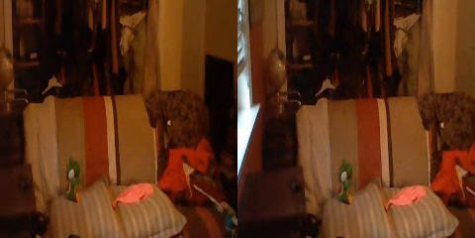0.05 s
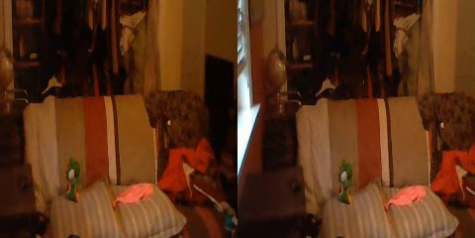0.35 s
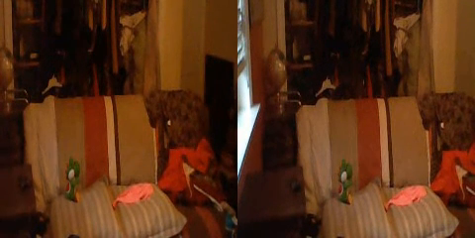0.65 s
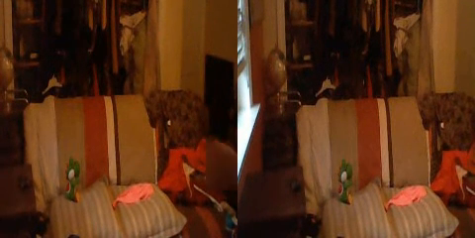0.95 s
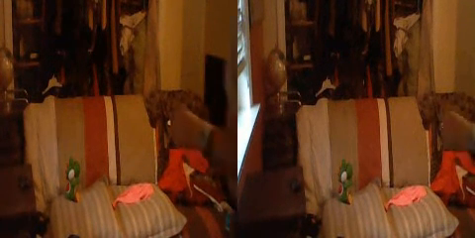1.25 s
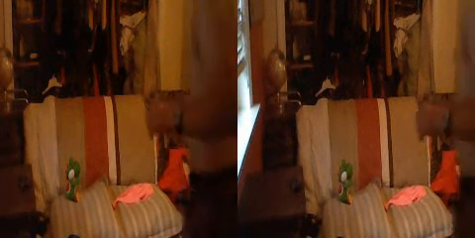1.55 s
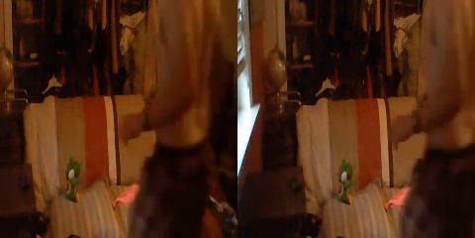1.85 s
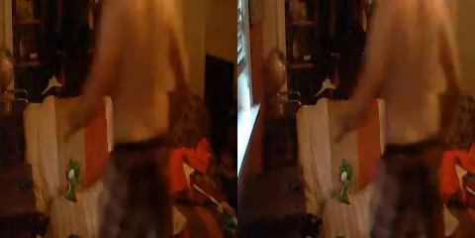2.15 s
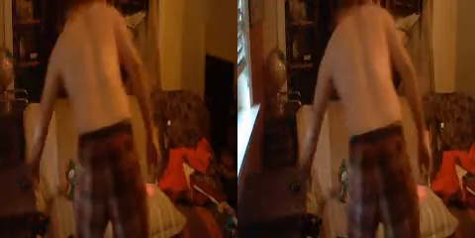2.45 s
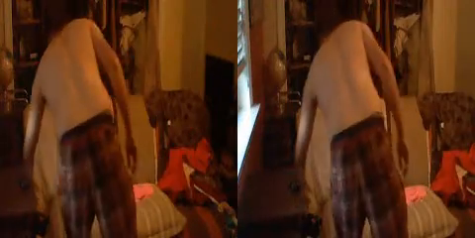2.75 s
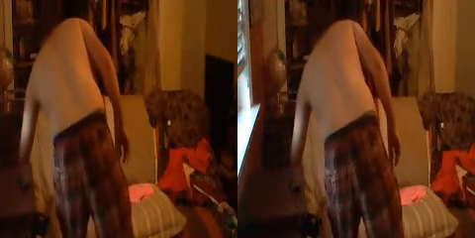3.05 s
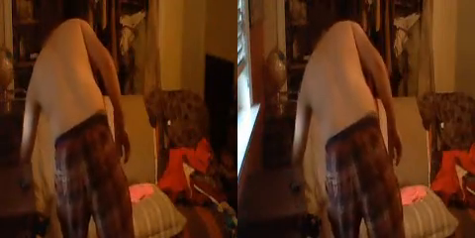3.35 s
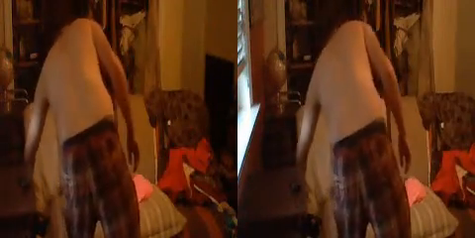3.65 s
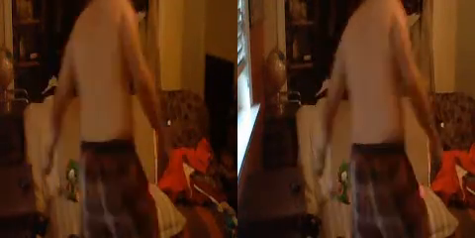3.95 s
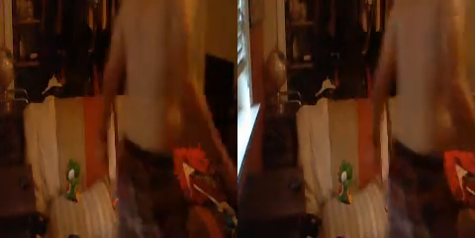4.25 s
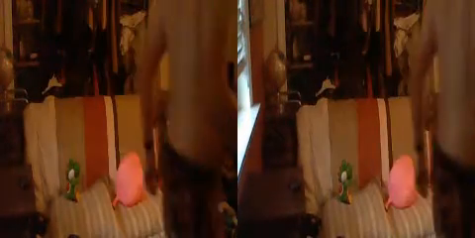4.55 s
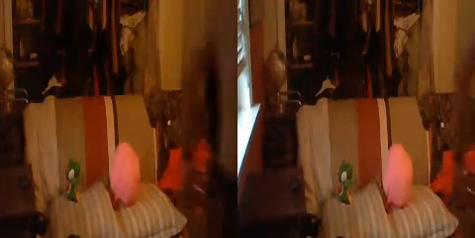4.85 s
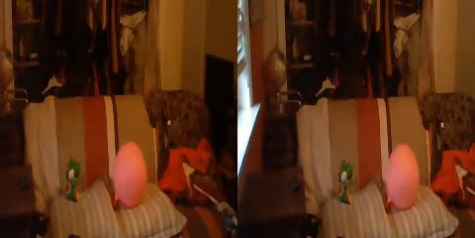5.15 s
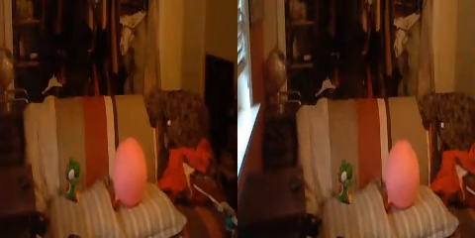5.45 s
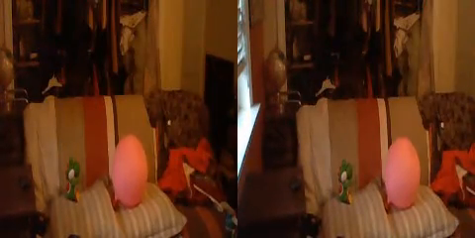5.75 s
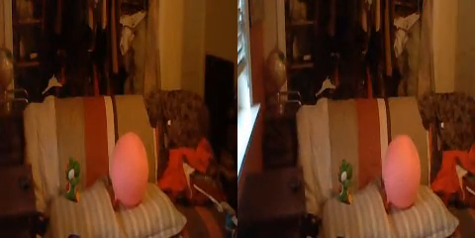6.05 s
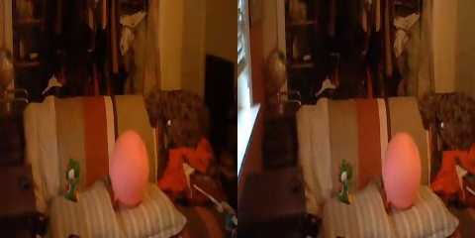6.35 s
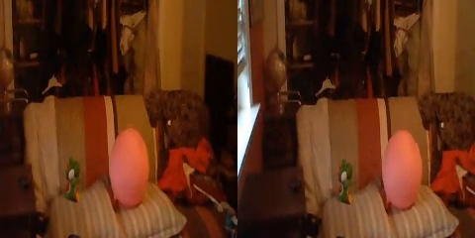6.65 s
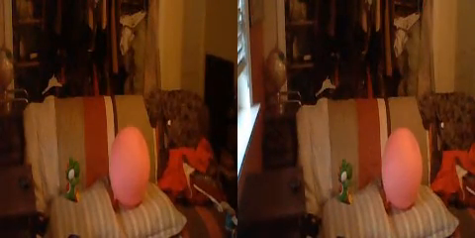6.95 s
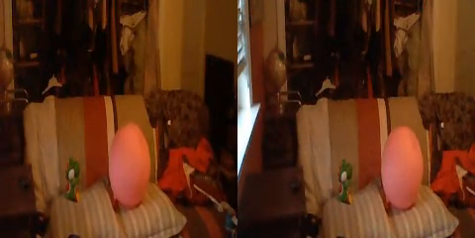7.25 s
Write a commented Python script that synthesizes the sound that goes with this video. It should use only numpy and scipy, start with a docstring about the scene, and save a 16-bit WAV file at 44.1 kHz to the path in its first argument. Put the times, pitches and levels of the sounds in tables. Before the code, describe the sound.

Low room rumble and faint microphone hiss run throughout, in a small furnished room heard from a webcam a little way off. From about 0.3 to 2.8 seconds a man's feet softly brush and slide over carpet, with a few dull thumps on the wooden floor beneath. At 3.3 seconds an electric blower starts abruptly, much louder, with a brief rasp and a quickly rising whine. A limp balloon flaps in the air stream from 3.5 to 4.5 seconds, giving a small slap at 4.2 as it snaps upright. More low footfalls come between 4 and 5.5 seconds, the heaviest near 4.9. By about 4.5 seconds the blower has nearly levelled off into a steady rush of air with a hum and thin, wavering whistles. It brightens slightly as the balloon fills and runs on until the end at about 7.4 seconds.

```python
"""An electric blower starts up and fills a balloon in a small furnished room, heard on a webcam microphone.
Its shaft hums, six blades whine and air rushes through the housing; the limp rubber flaps, then goes taut.
The microphone is far enough off for wall echoes to make the gliding tones flutter.
Around it a man shuffles over the carpet and his footfalls shake the wooden floor.
Behind everything lie room rumble and the webcam's own hiss and frame-rate buzz."""
import sys
import numpy as np
from scipy import signal
from scipy.fft import rfft, irfft
from scipy.io import wavfile
from scipy.ndimage import uniform_filter1d

SR = 44100
rng = np.random.default_rng(int(sys.argv[2]) if len(sys.argv) > 2 else 0)


def persist_wave(psi):
    """Save psi, clipped to +-1, as 16-bit WAV."""
    counts = np.round(np.clip(psi, -1, 1) * 32767).astype(np.int16)
    wavfile.write(sys.argv[1], SR, np.atleast_2d(counts).T)


N = 325458
T = np.arange(N) / SR
FREQS = np.fft.rfftfreq(N, 1 / SR)

# Room rumble and microphone hiss. Each row: frequency in Hz, relative level in dB.
FLOOR_SPECTRUM = [(8, -24), (15, -1), (31, -15), (69, -26.5), (123, -27), (240, -32), (360, -38),
                  (500, -34), (640, -39.5), (840, -39), (3300, -42.5), (7300, -47.5), (8200, -56),
                  (8800, -76.5)]
# A sole rubbing on carpet. Each row: frequency in Hz, relative level in dB.
CARPET_SPECTRUM = [(120, -14), (200, -7.5), (360, -5), (560, -5), (770, -4), (1000, -8), (1570, -8),
                   (2000, -13), (5500, -15), (7500, -19.5), (8800, -39)]
# Short brushes of foot and cloth. Each row: start in seconds, level in dB, 60 dB decay time in seconds.
FOOT_BRUSHES = [(0.274, -47, 0.45), (.378, -51.5, 0.55), (.42, -67, 0.36), (2.185, -47.5, 0.13),
                (2.275, -54, 0.11)]
# Feet sliding on the carpet. Each row: start and end in seconds, level in dB, treble against that level
# in dB, exponent of the swell (higher starts more gently), low draught rumble in dB.
FOOT_SLIDES = [(0.56, 0.923, -49.5, 1.3, 0.68, -58), (1.06, 1.224, -70, 15.5, 1.4, -71),
               (1.329, 1.723, -44.5, -0.5, 1.8, -36), (1.996, 2.18, -67, 9.5, 0.47, -44.5),
               (2.152, 2.363, -62, 4, 1.1, -43.5), (2.498, 2.85, -67, 1, 1, -70)]
# Steps on the floor. Each row: start in seconds, relative level in dB, 60 dB decay time in seconds,
# lowest pitch of the boards in Hz.
FOOTFALLS = [(1.07, -48.5, 0.24, 123.4), (1.337, -37, 0.38, 53.7), (1.48, -47, 0.49, 38.2),
             (1.611, -46, 0.23, 75), (2.125, -47.5, 0.56, 52), (4.069, -37.5, .5, 38),
             (4.45, -41, 0.33, 41), (4.879, -29, 0.25, 53.7), (4.903, -34, 0.81, 46.4), (5.5, -46, .3, 58)]
# Floorboard modes. Each row: multiple of the lowest pitch, relative level in dB.
BOARD_MODES = [(1, 3), (1.45, -8.5), (2.1, -13), (3.2, -13)]
# Rushing air. Each row: frequency in Hz, relative level in dB.
AIR_SPECTRUM = [(110, -16.5), (150, -20), (260, -13.5), (340, -1.5), (480, -10.5), (700, -4), (1400, -8),
                (2200, -7), (4200, -9.0), (5200, -9.5), (6600, -9.5), (7600, -15), (8300, -22.5),
                (8800, -43)]
# Resonances of housing and nozzle. Each row: centre in Hz, width in Hz, boost in dB.
HOUSING_RESONANCES = [(191.5, 60, 10.5), (396, 31, 3), (532, 65, 5.5), (615, 17, 7), (754, 13, 3),
                      (882, 19, 9), (995, 50, 1.5), (1130, 49, 5.5), (1209, 28, 6), (1300, 31, 3.5),
                      (1566, 6.8, 6), (1624, 65, 0), (1782, 44, 5), (2330, 16, 7), (2630, 300, 2.5),
                      (3210, 210, 3), (4160, 520, 4)]
# The rush in four bands, from depth to hiss. Each row: full-speed gain in dB with the balloon empty,
# the same with it round, power of the speed that the amplitude follows.
RUSH_BANDS = [(-29.5, -28.5, 3.4), (-28.5, -29, 1.8), (-30, -27.5, 1.9), (-30, -29.5, 2.8)]
# Thin whistles. Each row: Hz lost per Hz of shaft rate, full-speed level in dB with the balloon slack,
# the same with it taut.
THIN_WHISTLES = [(30, -42.8, -48), (36, -41, -53)]
# Growl of the accelerating motor. Each row: multiple of the shaft rate, level in dB at greatest strain.
GROWL_PARTIALS = [(2, -40.5), (3, -50), (4, -46), (5, -49), (8, -46)]
# The shaft's quick surge and slow creep. Each row: shortfall at switch-on in Hz, time constant in seconds.
SPIN_UP_LAGS = [(279.5, .1786), (9.84, .948)]
# Course of the blade whine. Each row: time in seconds, relative level in dB.
WHINE_LEVELS = [(3.33, -55), (3.45, -40), (3.57, -28), (3.82, -34), (4.15, -40), (4.95, -31), (5.13, -45),
                (5.88, -44.5), (6.28, -30), (7.38, -32)]
# Course of the whine's octave. Each row: time in seconds, level in dB.
OCTAVE_LEVELS = [(3.33, -53), (3.5, -45), (3.66, -54.9), (3.8, -40.5), (4.45, -42.5), (4.78, -35.5),
                 (5.45, -45.5), (5.67, -35.5), (5.87, -53.5), (6.05, -38), (6.3, -51.8), (6.5, -34),
                 (6.8, -39.5), (7.08, -30), (7.38, -32)]
# Weak shaft overtones. Each row: multiple of the shaft rate, full-speed level in dB with the balloon
# slack, the same with it taut.
SHAFT_OVERTONES = [(4, -54, -53.5), (8, -66.5, -45.5), (18, -51, -44.5)]

SWITCH_ON_S, FULL_HZ = 3.305, 330.5  # the blower starts; its shaft rate at full speed
# The balloon flaps in the jet, lifts, takes its round shape (each from, to), then goes taut all at once.
FLAPS_S, LIFTS_S, FILLS_S, TAUT_S = (3.48, 4.54), (4.03, 4.22), (4.6, 5.2), 5.4


def undb(db):
    """Decibels to gain."""
    return 10 ** (np.asarray(db) / 20)


def unit(x):
    """Scale to rms 1."""
    return x / np.sqrt(np.mean(np.abs(x) ** 2))


def colour(points, bumps=()):
    """Gain per frequency from (Hz, dB) points and (Hz, width in Hz, dB) resonances."""
    hz, db = np.transpose(points)
    db = np.interp(np.log(FREQS + 1), np.log(hz), db)
    return undb(db + sum(boost * 2 ** -((2 * (FREQS - f) / width) ** 2) for f, width, boost in bumps))


def shape(x, gain):
    """Filter by a gain per frequency."""
    return irfft(rfft(x) * gain, N)


def noise(gain):
    """Coloured noise of rms 1."""
    return unit(shape(rng.standard_normal(N), gain))


def noise_band(hz, width_hz):
    """Noise of rms 1 in a bell-shaped band."""
    return noise(np.exp(-((FREQS - hz) / width_hz) ** 2))


def treble(x, hz):
    """The part of a sound above a soft corner."""
    return shape(x, 1 - 1 / (1 + (FREQS / hz) ** 4))


def wander(rate):
    """Smooth random motion of rms 1 that changes about rate times a second."""
    smooth = np.convolve(rng.standard_normal(N // 16), np.hanning(11), "same")
    return unit(np.interp(8 * rate * T, np.arange(len(smooth)), smooth))


def fall(start, t60, rise_s=.0023):
    """Envelope of something struck at start; a softer contact rises more slowly."""
    age = np.maximum(T - start, 0)
    return (1 - np.exp(-age / rise_s)) * np.exp(-np.log(1000) * age / t60)


def curve(table):
    """A table of (s, value) points, one value per sample."""
    return np.interp(T, *np.transpose(table))


def switched_on(attack_s):
    """0 until the switch closes, then rising to 1."""
    return 1 - np.exp(-np.maximum(T - SWITCH_ON_S, 0) / attack_s)


def room(phase, wet_db=0, t60=.3):
    """A blower tone at the microphone: wall echoes beat against it, so it flutters about rms 1."""
    age, running = T[:SR // 3], T > SWITCH_ON_S
    walls = rng.standard_normal(len(age)) * np.exp(-np.log(1000) * age / t60) * (age > .003)
    direct = np.exp(1j * phase[running])
    echoes = signal.fftconvolve(direct, walls / np.sqrt(np.sum(walls ** 2)))[:len(direct)]
    heard = direct + undb(wet_db) * echoes
    local_rms = np.sqrt(uniform_filter1d(np.abs(heard) ** 2, size=6000) + 1e-9)
    return np.pad(np.sqrt(2) * heard.real / local_rms, (N - len(direct), 0))


def webcam(floor_db=-50.5, buzz_db=-66, whistle_db=-78, frame_hz=30):
    """Room rumble and microphone hiss, a burst of interference each frame, a faint electronic whistle."""
    frames = np.sin(np.pi * frame_hz * (T - .011)) ** 6
    buzz = unit(noise_band(hz=410, width_hz=150) * frames)
    whistle = np.sqrt(2) * np.sin(2 * np.pi * 3160 * T)
    return undb(floor_db) * noise(colour(FLOOR_SPECTRUM)) + undb(buzz_db) * buzz + undb(whistle_db) * whistle


def shuffling(grain_db=1, brush_treble_db=-3, draught_hz=24):
    """Soles brush and slide over the carpet; his movement stirs a draught that rumbles on the microphone."""
    rub = noise(colour(CARPET_SPECTRUM)) * undb(grain_db * wander(150))
    draught = noise(FREQS / (1 + (FREQS / draught_hz) ** 3))
    top = treble(rub, hz=2300)
    low = rub - top
    brushes = sum(undb(db) * fall(start, t60) for start, db, t60 in FOOT_BRUSHES)
    out = (low + top * undb(brush_treble_db)) * brushes
    for start, end, db, treble_db, gentleness, draught_db in FOOT_SLIDES:
        progress = np.clip((T - start) / (end - start), 0, 1)
        stroke = np.abs(np.sin(np.pi * progress)) ** gentleness
        out += ((low + top * undb(treble_db)) * undb(db) + draught * undb(draught_db)) * stroke
    return out


def footfalls(gain_db=2, thump_db=-14, cushion_s=.012):
    """Each step thumps through the carpet and sets the floorboards swinging; higher modes die sooner."""
    thump = noise_band(hz=130, width_hz=70) * undb(thump_db)
    out = np.zeros(N)
    for start, db, t60, hz in FOOTFALLS:
        span = (T > start) & (T < start + 1)
        age = T[span] - start
        landing = 1 - np.exp(-age / cushion_s)
        decay = np.exp(-np.log(1000) * age / t60)
        boards = sum(undb(mode_db) * decay ** np.sqrt(ratio) * np.sin(2 * np.pi * hz * ratio * age)
                     for ratio, mode_db in BOARD_MODES)
        out[span] += undb(gain_db + db) * landing * (boards + thump[span] * decay)
    return out


def balloon(flap_hz=(66.1, 90), flap_db=(-46, -42.5), fade_s=.075, slap_s=4.203, slap_hz=750):
    """Slack rubber flaps, faster and wilder as it lifts, puffing air as the nozzle booms; it snaps upright."""
    phase = 2 * np.pi * np.cumsum(np.interp(T, LIFTS_S, flap_hz)) / SR
    wildness = np.interp(T, LIFTS_S, (.3, .9))
    flap = unit(np.sin(phase + 1.3 * wildness * wander(30)) * (1 + .7 * wildness * wander(25)))
    puffs = undb(-2) * noise_band(hz=800, width_hz=500) * np.maximum(flap, 0)
    boom = undb(-7) * noise_band(hz=190, width_hz=25)
    flapping = np.clip(np.minimum(T - FLAPS_S[0], FLAPS_S[1] - T) / fade_s, 0, 1)
    strength = undb(np.interp(T, LIFTS_S, flap_db)) * flapping
    slap = undb(-23.5) * np.sin(2 * np.pi * slap_hz * (T - slap_s)) * fall(slap_s, t60=.11)
    return (flap + puffs + boom) * strength + slap


def shaft_rate():
    """Turns per second: the motor surges, then creeps up to full speed."""
    age = np.maximum(T - SWITCH_ON_S, 0)
    return FULL_HZ - sum(short_hz * np.exp(-age / lag_s) for short_hz, lag_s in SPIN_UP_LAGS)


def whistles(hz, speed_power=19):
    """Two thin whistles, one blade rate apart, sink and emerge near full speed; taut rubber lowers their level."""
    out = 0
    for slope, slack_db, taut_db in THIN_WHISTLES:
        pitch_hz = 16358 - slope * hz
        out += room(2 * np.pi * np.cumsum(pitch_hz) / SR) * undb(np.where(T > TAUT_S, taut_db, slack_db))
    return out * (hz / FULL_HZ) ** speed_power


def run_up(hz, rasp_db=-41, case_db=-53, case_hz=350, kick_db=-54, kick_hz=3500, thud_db=-53):
    """Starting torque jolts and rattles the case; the brushes rasp and the shaft growls until up to speed."""
    turn = 2 * np.pi * np.cumsum(hz) / SR
    speed = hz / FULL_HZ
    strain = np.interp(speed, (.44, .58, .7, 1), (0, 1, 1, 0))  # the motor labours hardest at part speed
    sparking = np.interp(speed, (.25, .38, .55, .72, .88), (0, 1, .5, .9, 0))
    growl = sum(room(k * turn, wet_db=-5) * undb(db) for k, db in GROWL_PARTIALS)
    rasp = undb(rasp_db) * noise_band(hz=2450, width_hz=750) * (.7 + .3 * np.cos(turn))
    jolt = undb(case_db) * np.sin(2 * np.pi * case_hz * T) * fall(SWITCH_ON_S, t60=.76)
    kick = undb(kick_db) * noise(colour(AIR_SPECTRUM) / np.hypot(1, FREQS / kick_hz))
    thud = undb(thud_db) * noise_band(hz=75, width_hz=45)
    rattle = (kick + thud) * fall(SWITCH_ON_S, t60=1.6, rise_s=.0053)
    return strain * growl + sparking * rasp + jolt + rattle


def air(hz, churn_db=.9, flicker_db=.64):
    """Turbulence rings the housing; it gains depth and hiss with speed and brightens as the balloon fills."""
    rush = noise(colour(AIR_SPECTRUM, HOUSING_RESONANCES))
    hiss = treble(rush, hz=3500)
    low = rush - treble(rush, hz=1600)
    body = treble(low, hz=380)
    churn = undb(churn_db * wander(13))
    flicker = undb(flicker_db * wander(29))
    bands = ((low - body) * churn, body * churn, rush - hiss - low, hiss * flicker)
    out = sum(band * (hz / FULL_HZ) ** power * undb(np.interp(T, FILLS_S, (empty_db, round_db)))
              for band, (empty_db, round_db, power) in zip(bands, RUSH_BANDS))
    return out * switched_on(attack_s=.008) ** 2


def motor(hz, jitter=.0005, hum_db=-25.5, null_hz=320.4, null_width_hz=7.4):
    """An unbalanced shaft hums; six blades chop the air into a whine."""
    speed = hz / FULL_HZ
    turn = 2 * np.pi * np.cumsum(hz * (1 + jitter * wander(25))) / SR
    # At the microphone the rising hum passes through a null of the room.
    dip_db = -9.5 * 2 ** -((2 * (hz - null_hz) / null_width_hz) ** 2)
    hum = np.sqrt(2) * np.sin(turn) * speed ** 9.4 * undb(hum_db + dip_db + .26 * wander(59))
    partials = [(6, undb(curve(WHINE_LEVELS) + .2)), (12, undb(curve(OCTAVE_LEVELS)))]
    partials += [(k, speed ** 3 * undb(np.where(T > TAUT_S, taut_db, slack_db)))
                 for k, slack_db, taut_db in SHAFT_OVERTONES]
    whine = sum(room(k * turn) * gain for k, gain in partials)
    return (hum + whine) * switched_on(attack_s=.015)


def scene():
    """The blower, the balloon and the man walking, over the noise floor, at one microphone."""
    hz = shaft_rate()
    blower = motor(hz) + run_up(hz) + whistles(hz) + air(hz)
    return (blower + balloon() + shuffling() + footfalls() + webcam())[None]


def record(dry):
    """The webcam's buffer slips once, a soft bump in the hum, and its top is cut steeply."""
    slip_s, slip_samples, top_hz = 6.0205, 44, 8900
    slipped = dry[:, np.arange(N) - slip_samples * (T > slip_s)]
    return signal.sosfilt(signal.ellip(10, .2, 80, top_hz, fs=SR, output="sos"), slipped)


dry = scene()
out = record(dry)
persist_wave(out)
```